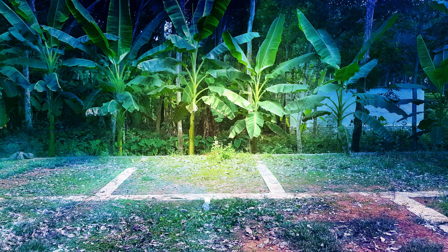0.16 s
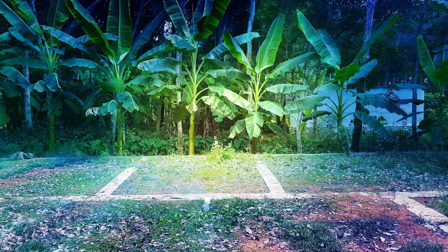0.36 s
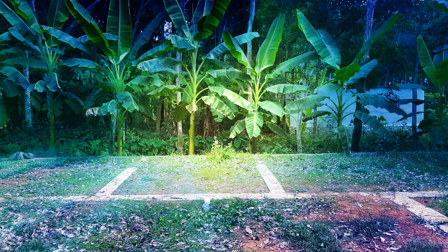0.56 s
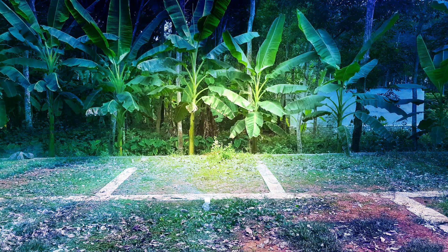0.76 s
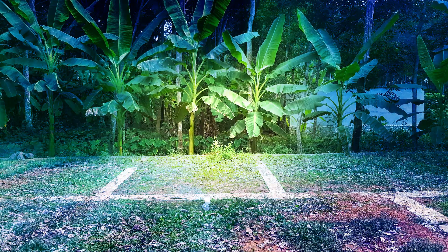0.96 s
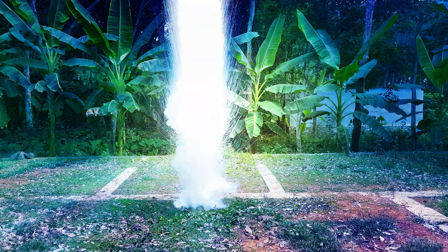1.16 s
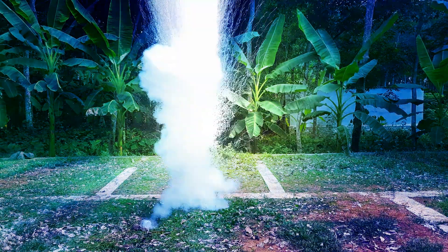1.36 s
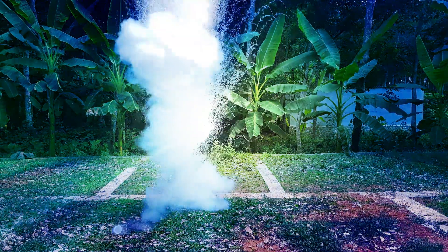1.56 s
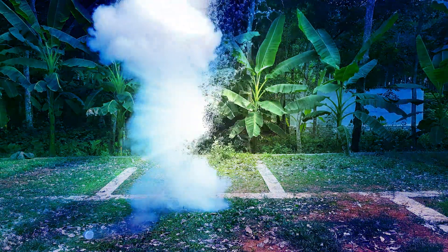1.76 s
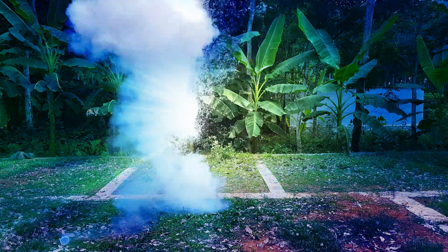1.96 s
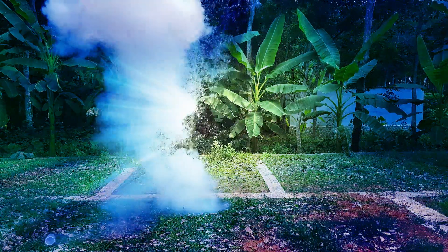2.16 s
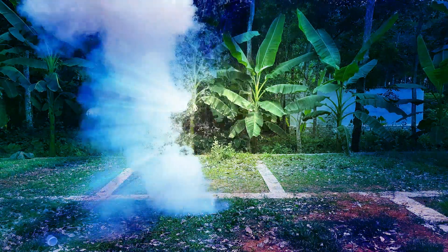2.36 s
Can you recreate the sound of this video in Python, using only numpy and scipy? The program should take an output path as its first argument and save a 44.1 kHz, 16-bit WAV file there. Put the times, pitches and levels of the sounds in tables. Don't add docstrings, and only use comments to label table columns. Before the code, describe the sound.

An explosion of reactive metal in water: quiet hissing, spitting, popping and faint whistling for a second, then one huge bang, rapid yard and tree echoes, and near silence with tiny drops, through a close stereo microphone.

```python
import sys
import numpy as np
from scipy import signal
from scipy.io import wavfile

SR = 44100
rng = np.random.default_rng(int(sys.argv[2]) if len(sys.argv) > 2 else 0)


def gain_from_decibels(decibels):
    exponent = np.asarray(decibels, float) / 20
    return 10 ** exponent


def master(y):
    cut = np.clip(np.atleast_2d(y).T, -1, 1)
    pcm = np.round(cut * 32767)
    wavfile.write(sys.argv[1], SR, pcm.astype(np.int16))


N = 107074
BURST_S, DUCK_DB = 1.0847, -19

# (frequency [Hz], left-right likeness [-1 to 1])
NEAR_LIKENESS = [(60, 0.87), (130, 1), (290, 0.74), (640, 0.28), (1410, -0.32), (3100, 0.46), (6820, 0.82),
                 (15000, 0.73)]


def rms_one(x):
    return x / np.sqrt(np.mean(x ** 2) + 1e-20)


def at_hz(points, hz):
    table_hz, values = np.array(points).T[:2]
    return np.interp(np.log(hz), np.log(table_hz), values)


def drift(rate):
    pole = np.exp(-80 * np.pi * rate / SR)
    noise = rng.standard_normal(N // 40 + 2002)
    slow = signal.lfilter([1], [1, -2 * pole, pole * pole], noise)[2000:]
    return np.interp(np.arange(N) / 40, np.arange(len(slow)), rms_one(slow))


def ring(clicks, hz, t60):
    radius, turn = 1000 ** (-1 / (t60 * SR)), 2 * np.pi * hz / SR
    feedback = [1, -2 * radius * np.cos(turn), radius * radius]
    return signal.lfilter([0, np.sin(turn)], feedback, clicks + 1e-18)


def grains(per_s, spread_db):
    sizes = gain_from_decibels(spread_db * np.minimum(rng.exponential(1, N), 4)) * rng.choice([-1, 1], N)
    return rms_one(sizes * (rng.random(N) < per_s / SR))


def strikes(rows):
    out = np.zeros((2, N))
    for s, db, pan_db, *_ in rows:
        halves = np.array([.5, -.5]) * np.clip(pan_db, -9, 9)
        out[:, min(int(s * SR), N - 1)] += gain_from_decibels(db + halves)
    return out


def bands(spectrum, likeness, patchy_db, shape=lambda hz: 1, extra=0):
    low_end, high_end = spectrum[0][0], spectrum[-1][0]
    edges = np.geomspace(low_end, high_end, int(3 * np.log2(high_end / low_end)) + 1)
    white, together = rng.standard_normal((2, 2, N)) + extra, drift(1.0)
    out, power = 0, 0
    for k, (low, high) in enumerate(zip(edges, edges[1:])):
        sos = signal.butter(2, [low, high], "band", fs=SR, output="sos")
        mid, side = signal.sosfilt(sos, white[k % 2])
        hz = np.sqrt(low * high)
        alike = np.clip(at_hz(likeness, hz), -.99, .99)
        gain = gain_from_decibels(at_hz(spectrum, hz) + patchy_db * (.6 * together + drift(24.0)))
        band = gain * (np.sqrt(1 + alike) * mid + np.sqrt(1 - alike) * side * [[1], [-1]])
        out = out + band * shape(hz)
        power = power + np.mean(band ** 2)
    return out / np.sqrt(power)


def shock(t):
    # (delay [s], push left, push right, suction [linear pressure], suction length [s])
    fronts = [
        (0, .75, 1.0, .9, .00078),
        (.00122, 1.5, 1.5, .45, .00095),
        (.0026, .2, .6, .03, .0008),
    ]
    push_s, sag_s, right_lag_s = .00038, .00019, .00011
    out, ragged = 0, 1 + .3 * rng.standard_normal((2, N))
    for delay, left, right, suction, length in fronts:
        u = t - BURST_S - delay - np.array([[0], [right_lag_s]])
        push = np.clip(u / 4e-5, 0, 1) * (u < push_s) * np.exp(-np.abs(u) / sag_s)
        after = np.maximum(u - push_s, 0)
        refill = np.clip(1 - .25 * after / length - (after / length) ** 5, 0, 1)
        out = out + push * ragged * [[left], [right]] - suction * np.clip(after / 9e-5, 0, 1) * refill
    return out


def heave(t):
    start_hz, sag_hz_per_s, delay_s, rise_s, fall_s = 80, 1400, .0022, .008, .0185
    left_db, pan_db = .3, 4.7
    u = np.clip(t - BURST_S - delay_s, 0, None)
    slowing = np.minimum(u, .025)
    turns = start_hz * u - sag_hz_per_s * slowing * (u - slowing / 2)
    envelope = (1 - np.exp(-(u + .003) / rise_s)) * np.exp(-(u / fall_s) ** 2)
    return np.sin(2 * np.pi * turns) * envelope * gain_from_decibels(left_db - pan_db * np.array([[0], [1]]))


def scatter(t):
    # (frequency [Hz], level [dB per Hz])
    spectrum = [(24, -29), (40, -4), (137, -12), (646, -7), (1900, -10), (2570, -10), (3650, -12),
                (12800, -19.5), (16000, -35.5)]
    # (frequency [Hz], left-right likeness [-1 to 1])
    far_likeness = [(60, 0.97), (130, 0.92), (290, 0.76), (640, 0.28), (1410, -0.23), (3100, 0.05),
                    (6820, -0.04), (15000, 0.06)]
    # (frequency [Hz], t60 [s])
    fast_t60 = [(60, 0.16), (250, 0.44), (700, 0.33), (2000, 0.34), (6000, 0.4), (15000, 0.25)]
    # (frequency [Hz], t60 [s])
    slow_t60 = [(60, 1.9), (250, 1.6), (800, 1.404), (2000, 1.13), (6000, 0.94), (15000, .5)]
    # (frequency [Hz], level [dB])
    slow_share = [(60, -18.5), (300, -18), (1000, -18), (4000, -19.5), (15000, -4)]
    level_db, early_db, arrives_s, rise_s = -11, -11, .0102, .007
    slaps_per_s, slap_share, blur_s = 450, 1.2, .16
    yard_hz, yard_width_hz, yard_boost = 738, 190, 0.92

    u = np.maximum(t - BURST_S - arrives_s - rise_s, 0)
    swell = np.clip((t - BURST_S - arrives_s) / rise_s, 0, 1)
    front = (t > BURST_S) * gain_from_decibels(early_db * (1 - swell))

    def decay(hz):
        fast = 1000. ** (-u / at_hz(fast_t60, hz))
        slow = gain_from_decibels(at_hz(slow_share, hz)) * 1000. ** (-u / at_hz(slow_t60, hz))
        return front * (fast + slow)

    clicks = np.array([grains(slaps_per_s, 3.5), grains(slaps_per_s, 3.5)])
    slaps = slap_share * .9 * np.exp(-u / blur_s) * clicks
    tail = gain_from_decibels(level_db) * bands(spectrum, far_likeness, 0.14, shape=decay, extra=slaps)
    return tail + yard_boost * signal.lfilter(*signal.iirpeak(yard_hz, yard_hz / yard_width_hz, SR), tail)


def struck(rows):
    return sum(ring(-strikes([(s, db, 0)]), hz, t60) for s, db, hz, t60 in rows)


def echoes():
    # (time [s], peak level [dB], frequency [Hz], t60 [s])
    booms = [(1.088, -19, 330, 0.03), (1.0998, -9, 700, 0.03), (1.106, -12, 640, 0.05),
             (1.108, -13, 1180, 0.025), (1.111, -15, 2520, 0.03), (1.113, -18, 197, 0.067),
             (1.115, -12, 798, 0.015), (1.126, -15, 790, 0.04), (1.139, -21, 1530, 0.03),
             (1.14, -17, 750, 0.05), (1.162, -20, 700, 0.05), (1.172, -24, 2120, 0.03),
             (1.207, -29, 71, 0.096), (1.25, -29, 740, 0.05), (1.255, -34, 80.5, .1),
             (1.295, -34.5, 85.6, 0.16), (1.325, -30.5, 103, 0.086), (1.345, -35, 75, 0.15),
             (1.5, -49, 850, 0.12), (1.52, -53, 80, 0.25), (1.599, -57.5, 75, 0.35), (1.66, -56, 880, 0.12),
             (1.701, -56, 70, 0.25)]
    return struck(booms)


def thuds():
    # (time [s], peak level [dB], frequency [Hz], t60 [s])
    landings = [(1.808, -63, 68, 0.14), (1.8085, -42, 254, 0.0075), (1.8105, -55, 110, 0.06),
                (1.84, -62, 860, 0.12), (1.865, -57, 118, 0.047), (2.0698, -43, 223, 0.0068),
                (2.074, -63, 58, 0.17), (2.09, -62, 150, 0.05), (2.174, -61, 600, 0.012),
                (2.182, -60, 760, 0.014), (2.406, -65.5, 190, 0.13)]
    return struck(landings)


def drops():
    # (time [s], peak level [dB], pan [dB], frequency [Hz])
    spray = [(1.7609, -51, 0, 3000), (1.7612, -53, 0, 11500), (1.7675, -55, 2, 10500),
             (1.785, -59, 2, 1500), (1.8, -57, 0, 12500), (1.8094, -55, -6, 2200), (1.8474, -57, -3, 2000),
             (1.854, -59, 0, 1500), (1.893, -59, 5, 9500), (1.948, -55, 0, 3000), (1.9482, -56, 0, 6500),
             (1.9484, -52, 0, 11500), (1.964, -58, 4, 11500), (2.0054, -60, 1.5, 3000),
             (2.0056, -54, 2, 10200), (2.017, -59, 3, 7000), (2.0304, -58, 1.5, 8500),
             (2.0592, -59, -3, 4600), (2.066, -58, 0, 12000), (2.0704, -59, 4, 1600),
             (2.0904, -61, 5, 1500), (2.0908, -57, 5, 9500), (2.1194, -56, 2, 8000), (2.1364, -60, 0, 6500),
             (2.1455, -57, 0, 12500), (2.1784, -61, 3, 4000), (2.1788, -58, 2, 10500),
             (2.3984, -58, -5, 5500), (2.3988, -56, -4, 12000), (2.4244, -62, -8, 3000)]
    splash_s, cycles = .003, 2.6
    after = np.arange(1, int(splash_s * SR)) / (splash_s * SR)
    noise, out = rng.standard_normal(len(after)), np.zeros((2, N))
    for k, (s, db, pan_db, hz) in enumerate(spray):
        breakup = .3 * np.roll(noise, 11 * k) * np.exp(-5 * after)
        splash = np.r_[1, breakup, np.zeros(200)]
        start = int(s * SR)
        tick = ring(splash, hz, cycles / hz)[:N - start]
        out[:, start:start + len(tick)] += gain_from_decibels(db + np.array([[.5], [-.5]]) * pan_db) * tick
    return out


def patter(t):
    per_s, from_s, level_db = 120, 1.6, -83
    ticks = np.array([ring(grains(per_s, 4.0), 10500, .0007) for _ in range(2)])
    return gain_from_decibels(level_db) * rms_one(ticks) * np.clip((t - from_s) / .3, 0, 1)


def hiss(t):
    # (time [s], level [dB], treble [dB])
    vigour = [(0.07, -46, -6.5), (0.136, -50, -2.5), (0.368, -50.5, -6), (0.39, -48.5, -2.5),
              (0.475, -47, -4), (0.495, -50.5, -6.5), (0.6, -52.5, -7), (0.64, -52, -8), (0.68, -50, -2.5),
              (0.76, -48, -5), (0.838, -47.5, -5.5), (0.922, -47, -2.5), (1.071, -46, -5)]
    # (frequency [Hz], level [dB per Hz])
    colour = [(210, -29), (350, -9.5), (1120, -7.5), (1570, -8.5), (1970, -12.5), (2980, -6.5), (7920, -16),
              (11600, -11.5), (16000, -24)]
    trim_db, spits_per_s, spit_share, spread_db = 3.5, 320, 0.88, 4.2
    dip_hz, dip_width_hz, dip_depth = 1900, 450, .7
    s, level_db, treble_db = np.transpose(vigour)
    bright_db = np.interp(t, s, treble_db - treble_db.mean())

    def tilt(hz):
        return gain_from_decibels(bright_db * np.log2(hz / 5000)) if hz > 2000 else 1

    spits = spit_share * grains(spits_per_s * gain_from_decibels(drift(2.4)), spread_db) * [[1], [.4]]
    gas = bands(colour, NEAR_LIKENESS, 1.8, tilt, spits)
    b, a = signal.iirpeak(dip_hz, dip_hz / dip_width_hz, SR)
    return gain_from_decibels(np.interp(t, s, level_db) + trim_db) * (gas - dip_depth * signal.lfilter(b, a, gas))


def pops():
    # (time [s], peak level [dB], pan [dB])
    pockets = [
        (0.237, -36, 4),
        (0.383, -37, -4),
        (0.47, -34, 2),
        (0.531, -35.5, -3),
        (0.682, -31.5, 1),
        (0.781, -32, -3),
        (0.845, -35, 2),
        (0.908, -36, 4),
        (1.014, -30, 3),
        (1.046, -41, -0.5),
    ]
    # (frequency [Hz], level [dB], t60 [s])
    modes = [
        (720, -6, .018),
        (1150, -11, .01),
        (230, -7, .02),
    ]
    soft = signal.lfilter([.3], [1, -.7], strikes(pockets))
    return sum(gain_from_decibels(db) * ring(soft, hz, t60) for hz, db, t60 in modes)


def snaps():
    # (time [s], peak level [dB], pan [dB])
    sharp_spits = [(0.0665, -36, -1.5), (0.1164, -37, -0.5), (0.161, -37, 0.0), (0.209, -35.5, -1.5),
                   (0.3844, -36, -1.0), (0.4, -40, -0.5), (0.4714, -36, -1.0), (0.6854, -38, -1.0),
                   (0.7148, -34, -1.0), (0.7794, -35, -1.5), (0.8478, -34, -1.0), (0.8793, -34, -0.5),
                   (0.907, -34.5, -3), (0.974, -29, -1), (1.0134, -34, 1)]
    clicks = strikes(sharp_spits)
    return gain_from_decibels(-0.98) * (ring(clicks, 9706, .0007) + 0.25 * ring(clicks, 3900, 0.0048))


def whistle(t, start, end, hz, sag, db):
    sharpness, fade_s = 26, .06
    u = t - start
    carrier = np.exp(2j * np.pi * (hz * u - sag * u ** 2 / 2))
    sos = signal.butter(2, hz / sharpness / 2, fs=SR, output="sos")
    wobble = signal.sosfilt(sos, rng.standard_normal((2, 2, N)))
    wobble = wobble + np.clip(1000 / hz - .6, 0, 4) * wobble[:, :1]
    fade = np.clip(np.minimum(u, end - t) / fade_s + .5, 0, 1)
    return gain_from_decibels(db) * fade * rms_one(np.real((wobble[0] + 1j * wobble[1]) * carrier))


def leaks(t):
    # (start [s], end [s], frequency [Hz], sag [Hz per s])
    tones = [
        (.06, .95, 1670, 190),
        (.08, .38, 815, 30),
        (.52, .76, 1310, 90),
        (2.15, 2.31, 1600, 0),
        (.6, .82, 107, -30),
        (.45, 1.05, 760, 20),
    ]
    tone_db = [-58, -58, -57, -63.5, -56.5, -61]
    return sum(whistle(t, *row, db) for row, db in zip(tones, tone_db))


def boil(t):
    # (time [s], level [dB])
    churning = [(0.07, -48), (0.406, -57.5), (0.464, -50), (0.496, -51.5), (0.798, -49.5), (0.822, -51.5),
                (0.91, -44), (0.988, -54), (1.04, -47.5)]
    # (frequency [Hz], level [dB per Hz])
    rumble = [(18, -33.5), (30, -9), (49, 5.5), (80, -10), (114, 4), (400, -15), (520, -44), (880, -120)]
    return gain_from_decibels(np.interp(t, *np.transpose(churning))) * bands(rumble, NEAR_LIKENESS, 4.2)


def air():
    # (frequency [Hz], level [dB per Hz])
    ambience = [(24, -55.5), (40, -19), (226, -10), (444, -20), (1370, -20), (1480, -13), (1850, -32),
                (10700, -25), (16000, -38)]
    return gain_from_decibels(-51.5) * bands(ambience, NEAR_LIKENESS, 0.98)


def scene():
    t = np.arange(N) / SR
    blast = shock(t) + heave(t) + scatter(t) + echoes()
    fallout = thuds() + drops() + patter(t)
    reaction = (hiss(t) + pops() + snaps() + boil(t)) * (t < BURST_S)
    return gain_from_decibels(-DUCK_DB) * (blast + fallout) + reaction + leaks(t) + air()


def low_pass(x):
    return signal.sosfilt(signal.butter(12, 16500, fs=SR, output="sos"), x)


def record(dry):
    # (frequency [Hz], width [Hz], depth [0-1])
    mic_dips = [
        (6700, 6200, 0.3),
        (9000, 5200, 0.6),
    ]
    start_s, recover_db_per_s, ceiling = .0592, 0.5, 1.2
    t = np.arange(N) / SR
    duck_db = (t >= BURST_S) * (DUCK_DB + recover_db_per_s * (t - BURST_S))
    gain = gain_from_decibels(duck_db) * np.clip((t - start_s) / 0.00051, 0, 1)
    ports = []
    for channel, (hz, width, depth) in zip(dry, mic_dips):
        shaded = signal.lfilter(*signal.iirpeak(hz, hz / width, SR), channel)
        ports.append(channel - depth * shaded)
    x = ceiling * np.tanh(gain * np.array(ports) / ceiling)
    x = signal.sosfilt(signal.cheby2(16, 42, 15800, fs=SR, output="sos"), x)
    x = signal.sosfilt(signal.butter(1, 18, "high", fs=SR, output="sos"), x)
    return low_pass(x)


dry = scene()
out = record(dry)
master(out)
```